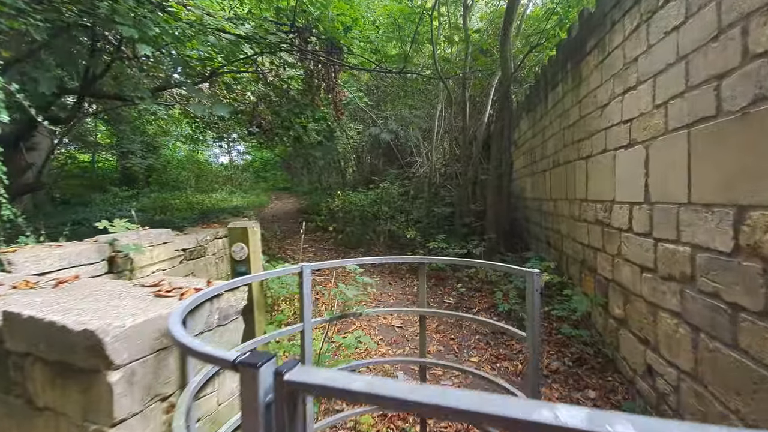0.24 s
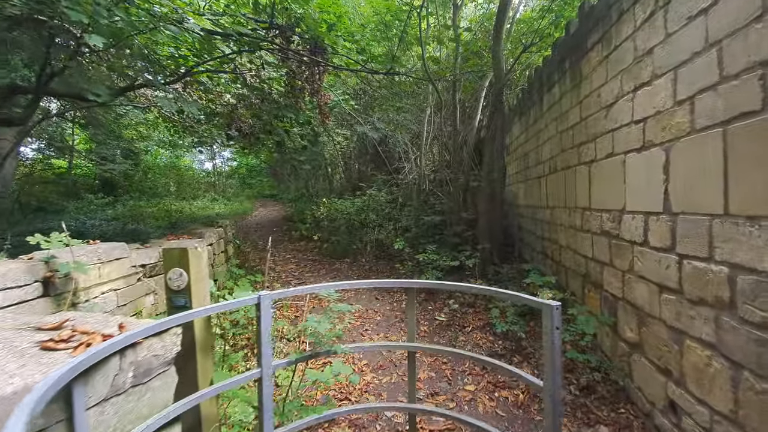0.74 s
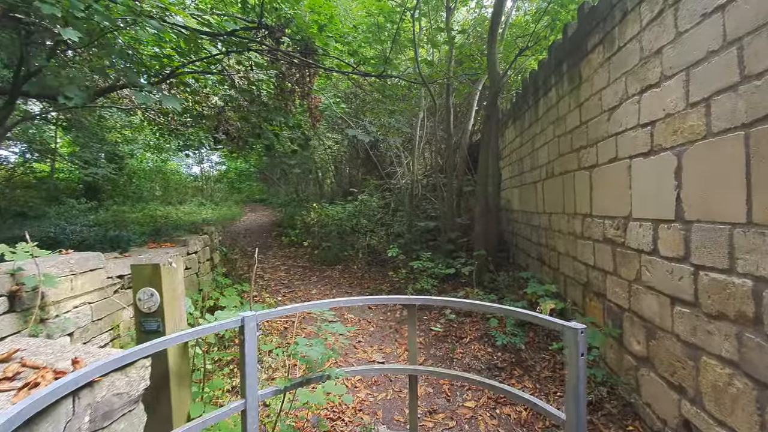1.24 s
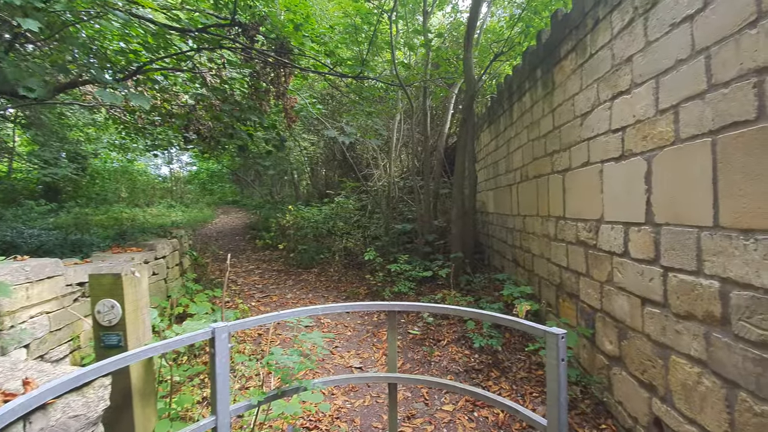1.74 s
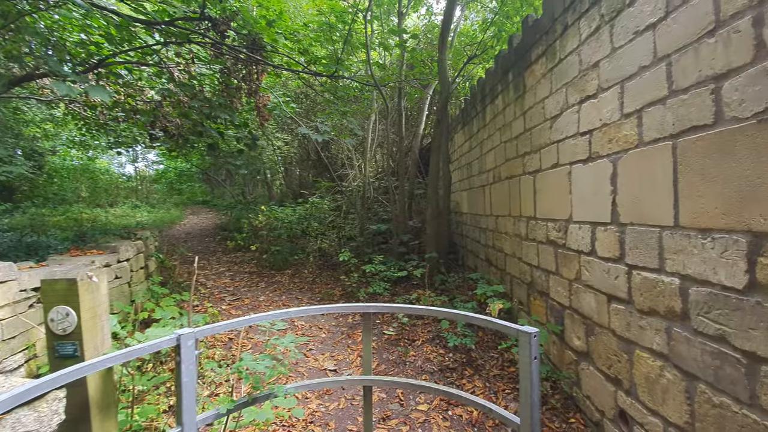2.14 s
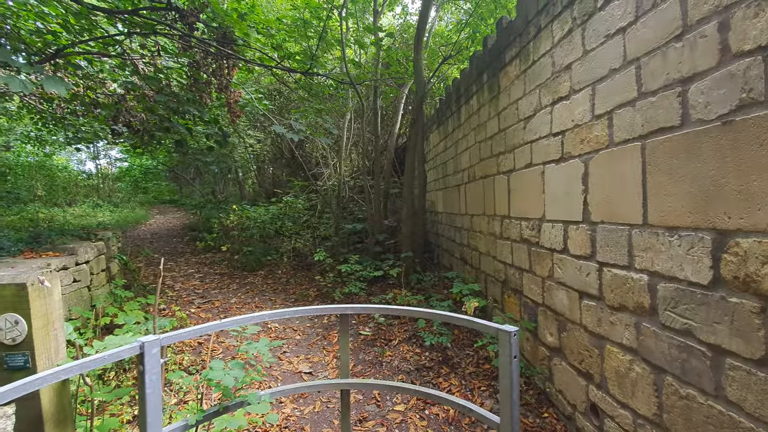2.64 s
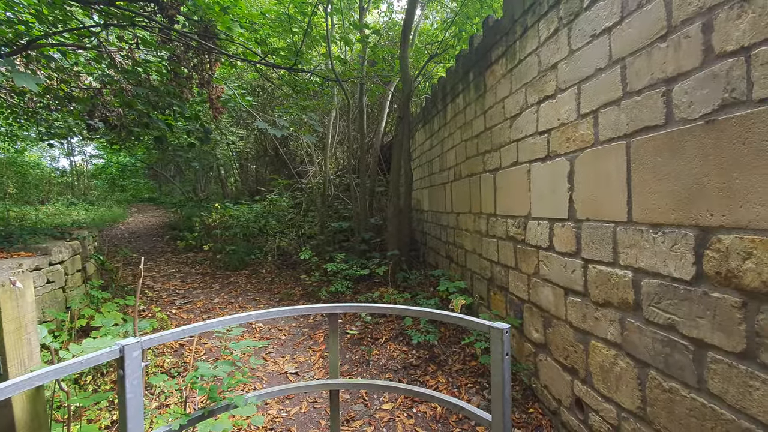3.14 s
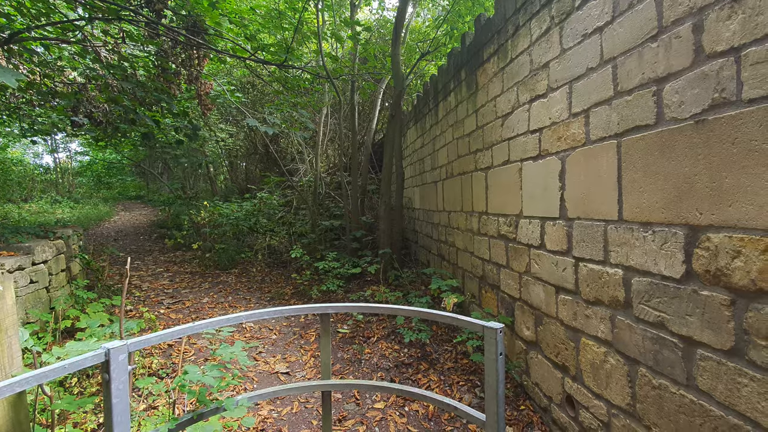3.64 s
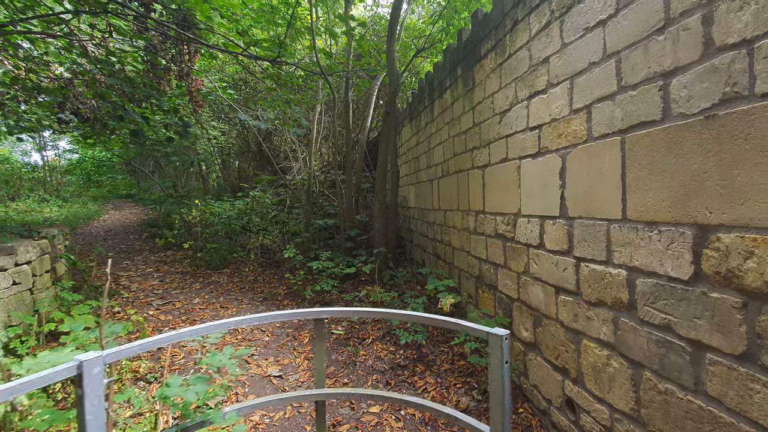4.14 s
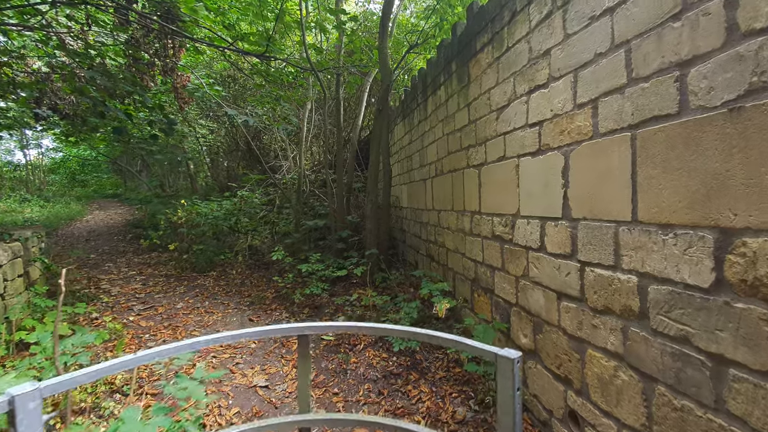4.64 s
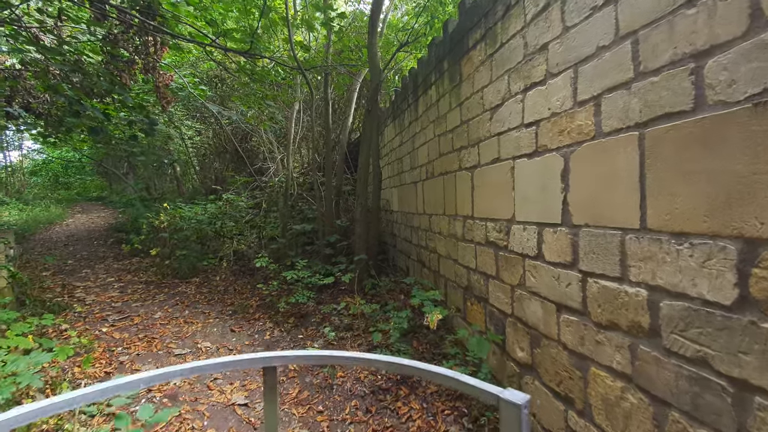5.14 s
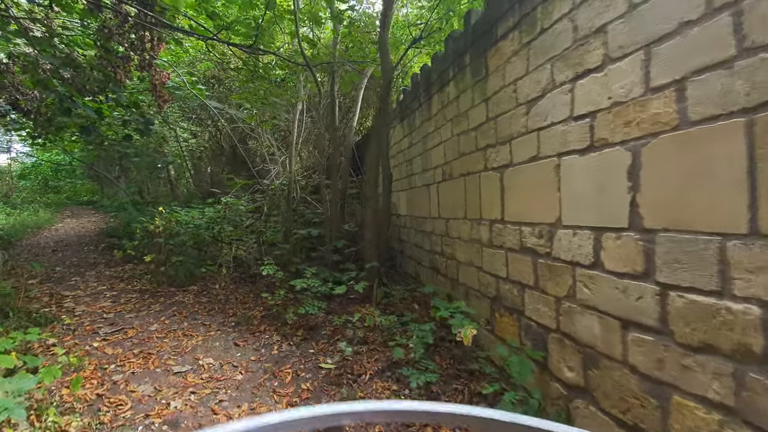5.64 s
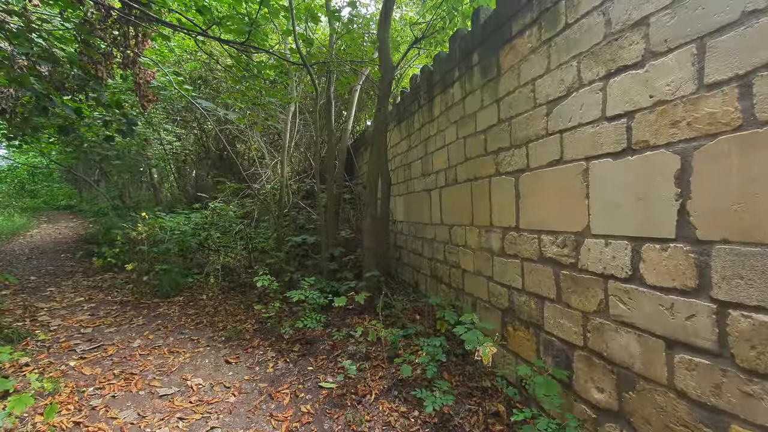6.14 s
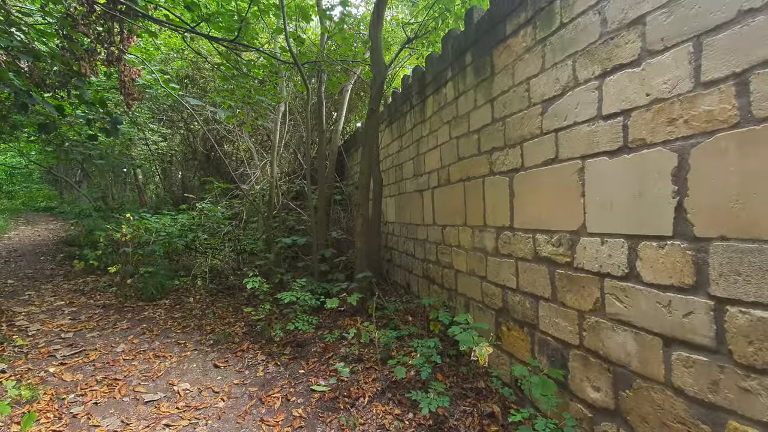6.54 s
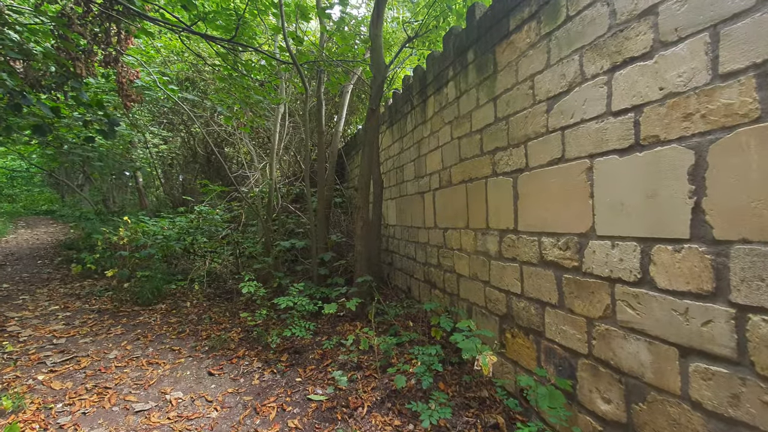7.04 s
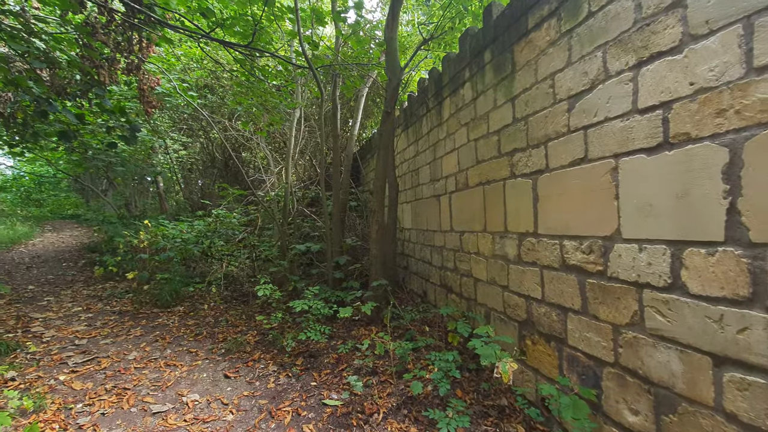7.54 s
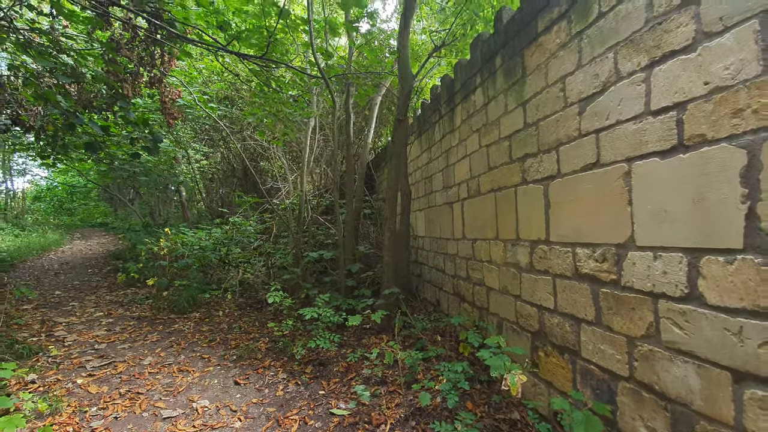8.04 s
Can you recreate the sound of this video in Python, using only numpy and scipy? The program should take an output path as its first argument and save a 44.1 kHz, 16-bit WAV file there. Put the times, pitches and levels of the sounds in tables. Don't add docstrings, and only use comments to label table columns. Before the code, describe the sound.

Outdoors under trees, faint leaf hiss and distant rumble throughout. Chirps and dry footsteps open, a hoarse bird caws twice far off, and thin steel bars are tapped gently. After a crisp latch knock and a few thuds on the microphone, the gate swings into its frame with a hard clang, rattles back a moment later, and its ring fades with a slight woodland echo.

```python
import sys
import numpy as np
from scipy import signal
from scipy.fft import rfft, irfft
from scipy.io import wavfile
from scipy.ndimage import uniform_filter1d, minimum_filter1d, map_coordinates

SR = 44100
rng = np.random.default_rng(int(sys.argv[2]) if len(sys.argv) > 2 else 0)


def nominal_scale(level):
    x = np.asarray(level, float) / 20
    return 10 ** x


def wav_out(sig):
    wavfile.write(sys.argv[1], SR, np.round(np.clip(np.atleast_2d(sig).T, -1, 1) * 32767).astype(np.int16))


N = 366471

# start_s, force_db, build_up_s, hardness_hz
LEAF_HITS = [
    (7.0215, -20.5, 0.0014, 12000),
    (7.0263, -28, .0005, 12000),
    (7.0322, -30.5, 0.00056, 12000),
    (7.0375, -32, .0005, 12000),
    (7.042, -32, 0.00035, 9000),
]
# start_s, force_db, build_up_s, hardness_hz
HOOP_HITS = [
    (7.203, -25, 0.006, 4300),
    (7.21, -30, 0.0015, 4300),
    (7.2255, -27, 0.0015, 15900),
    (7.231, -31, .001, 9000),
    (7.244, -27, 0.0015, 9000),
    (7.251, -30, .001, 9000),
    (7.36, -27, 0.026, 2440),
    (7.44, -42, 0.039, 3493),
]
# pitch_hz, level_db, t60_s
LEAF_MODES = [(961, -31, 0.7), (1390, -27, 0.58), (2224, -18, 0.04), (2595, -28, 0.7), (2611, -19, 0.18),
              (2763, -17, 0.09), (2966, -27, 0.39), (3044, -27, 0.33), (3114, -27, 0.48), (3136, -27, 0.27),
              (3222, -15, 0.09), (3253, -30, 0.7), (3278, -28, 0.48), (3377, -25, 0.22), (3417, -16, 0.1),
              (3462, -15, 0.22), (3474, -28, 0.27), (3591, -22, 0.22), (3713, -25, 0.22), (3736, -35, 0.5),
              (3799, -8, 0.09), (3835, -26, 0.48), (3848, -33, 0.7), (3949, -20, 0.15), (3994, -19, 0.22),
              (4025, -24, 0.27), (4125, -22, 0.18), (4162, -22, 0.18), (4187, -25, 0.27), (4223, -23, 0.18),
              (4368, -25, 0.22), (4450, -19, 0.18), (4511, -26, 0.22), (4561, -30, 0.39), (4590, -28, 0.22),
              (4660, -27, 0.22), (4875, -20, 0.15), (4957, -10, 0.04), (5028, -21, 0.18), (5229, -28, 0.39),
              (5276, -27, 0.18), (5341, -24, 0.22), (5403, -27, 0.27), (5507, -28, 0.18), (5575, -21, 0.22),
              (5638, -21, 0.07), (5812, -28, 0.15), (5986, -22, 0.09),
              (545, -38, .4), (639, -38, .4), (950, -39, .3), (1069, -28, .3), (1233, -31, .4),
               (1809, -35, .36), (1933, -35, .33), (2531, -29, .3), (6390, -30, .12), (6455, -36, .2),
               (7031, -32, .15), (7400, -36, .12), (9500, -36, .1)]
# pitch_hz, level_db (per Hz)
LEAF_CROWD = [(150, -69.5), (250, -31.5), (302, -25.5), (837, -24), (945, -11), (1140, -11), (1430, -14),
              (1510, -18), (3700, -0.5), (5600, -10.5), (15500, -35.5)]


def slam():
    swing_s = HOOP_HITS[1][0] - LEAF_HITS[1][0]
    return blow(LEAF_HITS, LEAF_MODES, LEAF_CROWD, early_db=10.5, damping=2.87, tilt=0.05,
                size=56000, main=1, free_s=swing_s)


# pitch_hz, level_db, t60_s
HOOP_MODES = [(787, -40, 0.7), (1327, -28, 0.07), (1390, -34, 0.7), (2078, -30, 0.18), (2410, -40, 0.48),
              (2531, -31, 0.7), (2587, -40, 0.58), (2600, -35, 0.7), (2623, -36, 0.39), (2680, -35, 0.7),
              (2692, -28, 0.7), (2723, -22, 0.27), (2735, -33, 0.48), (2761, -32, 0.48), (2837, -30, 0.58),
              (2851, -37, 0.39), (2882, -19, 0.27), (2954, -34, 0.13), (3039, -37, 0.33), (3248, -39, 0.48)]
# pitch_hz, level_db, t60_s
TUBES = [(543, -51, 1.7), (580, -50, 1.1), (640, -46, 1.8), (673, -48, 1.6), (774, -47, 1.3),
         (787, -48, 1.8), (951, -42, 1.0), (964, -43, 1.5), (1102, -53, 1.4), (1248, -52, 1.8),
         (1322, -54, 2.1), (2532, -41, 1.6), (2559, -43, .9), (2582, -42, .9), (2716, -42, .9),
         (2765, -44, 1), (2829, -48, 1.1), (2868, -42, 1), (2916, -50, 1.1), (2928, -46, 1.8),
         (3135, -42, .6), (3348, -38, .6), (3655, -40, .6), (4604, -47, .9), (5416, -46, .5)]
# pitch_hz, level_db (per Hz)
HOOP_CROWD = [(150, -69), (250, -54), (1360, -20.5), (1900, -20.5), (2330, -19.5), (2660, -4),
              (3060, -14.5), (4630, -5), (5800, -10.5), (8470, -23.5), (10400, -19.5), (13300, -34),
              (15500, -69)]
# pitch_hz, level_db, t60_s
CLAP_MODES = [(3493, -27, 0.12), (3892, -28, 0.17), (3920, -29, 0.24), (4130, -25, 0.1), (4178, -30, 0.29),
              (4292, -28, 0.2), (4364, -29, 0.12), (4516, -23, 0.29), (4582, -32, 0.29), (4658, -29, 0.29),
              (4686, -25, 0.29), (4698, -35, 0.42), (4738, -32, 0.24), (4863, -28, 0.17), (4899, -26, 0.24),
              (4982, -27, 0.1), (5131, -29, 0.2), (5366, -31, 0.17), (5521, -36, 0.5), (5577, -33, 0.24),
              (6037, -33, 0.29), (6149, -31, 0.14), (6244, -21, 0.04), (10104, -31, 0.08)]
# pitch_hz, level_db, t60_s
CLAP_FAINT = [(7200, -40, .15), (9500, -44, .25), (10400, -40, .1), (11200, -46, .12), (12100, -47, .15),
              (13300, -50, .1)]


def rebound():
    hoop = blow(HOOP_HITS, HOOP_MODES, HOOP_CROWD, early_db=6, damping=1.53, tilt=0.17,
                size=48000, main=1, free_s=0.25, lasting=TUBES)
    graze = struck(HOOP_HITS[1][0] - 0.003, CLAP_MODES[:-2], 9000, force_db=-8.4, free_s=0.017)
    clap = struck(HOOP_HITS[2][0], CLAP_MODES + CLAP_FAINT, 24000, force_db=-1.0)
    return hoop + graze + clap


# start_s, force_db, build_up_s, hardness_hz
LATCH_HITS = [
    (4.682, -49, 0.00039, 9100),
    (4.686, -38.5, 0.00091, 14000),
    (4.695, -31.5, 0.0012, 9100),
]
# pitch_hz, level_db, t60_s
LATCH_MODES = [(1445, -44, 0.2), (1490, -41, 0.2), (2139, -44, 0.39), (2720, -36, 0.07), (2783, -33, 0.26),
               (2842, -43, 0.26), (2894, -40, 0.21), (2949, -38, 0.26), (2996, -38, 0.11),
               (3892, -44, 0.32), (3949, -38, 0.14), (4388, -30, 0.04), (4766, -26, 0.05),
               (4813, -42, 0.16), (4932, -41, 0.14), (5000, -28, 0.04), (5092, -39, 0.17),
               (5298, -31, 0.07), (5332, -40, 0.17), (5349, -31, 0.13), (5372, -42, 0.18),
               (5917, -41, 0.17), (5973, -36, 0.08), (6103, -30, 0.06), (6632, -35, 0.11),
               (6902, -43, 0.32), (7962, -42, 0.09)]
# pitch_hz, level_db, t60_s
LATCH_FAINT = [(2815, -46.5, .75), (2757, -56, .9), (4670, -50, .4), (6331, -49, .16), (8150, -55, .2),
               (9400, -57, .12), (10750, -52, .13), (11900, -62, .12), (13100, -63, .12), (14500, -60, .09)]
# pitch_hz, level_db (per Hz)
LATCH_CROWD = [(290, -58), (500, -19.5), (1120, -16.5), (1470, -4.5), (1990, -11.5), (2840, -9),
               (4200, -10), (5200, -9.5), (10400, -17.5), (15500, -40)]


def latch_knock():
    return blow(LATCH_HITS, LATCH_MODES, LATCH_CROWD, early_db=-19, damping=0.96, tilt=0.38,
                size=24000, main=1, lasting=LATCH_FAINT)


# start_s, force_db, build_up_s, hardness_hz
RAIL_HITS = [
    (2.313, -50, 0.0008, 7000),
    (2.319, -44, 0.0014, 5970),
]
# pitch_hz, level_db, t60_s
RAIL_MODES = [(1512, -49, 0.24), (1839, -43, 0.1), (1930, -52, 0.24), (2161, -52, 0.2), (2539, -57, 0.5),
              (2644, -45, 0.08), (2785, -57, 0.5), (2809, -52, 0.42), (2850, -33, 0.06), (2917, -54, 0.29),
              (2943, -53, 0.29), (3637, -51, 0.2), (3941, -52, 0.35), (3963, -53, 0.35), (4195, -53, 0.2),
              (4225, -44, 0.12), (4280, -50, 0.1), (4739, -51, 0.17), (5406, -45, 0.08), (6190, -50, 0.2)]
# pitch_hz, level_db, t60_s
RAIL_FAINT = [(953, -54, .3), (840, -57, .2), (5443, -51, .2), (6050, -50, .08), (6907, -60, .14),
              (8037, -60, .16)]
# pitch_hz, level_db (per Hz)
RAIL_CROWD = [(290, -52), (500, -31), (709, -13), (1850, -8.5), (2290, -9), (2860, -8.5), (5580, -14),
              (12500, -24)]


def rail_knock():
    knock = blow(RAIL_HITS, RAIL_MODES, RAIL_CROWD, early_db=-11, damping=1.0, tilt=0.31,
                 size=18000, main=1, lasting=RAIL_FAINT)
    return knock + struck(RAIL_HITS[0][0], RAIL_MODES + RAIL_FAINT, 9000, force_db=-7, free_s=0.0052)


# start_s, force_db, build_up_s, hardness_hz
BAR_HITS = [
    (3.119, -44.5, 0.001, 8900),
    (3.13, -39.5, 0.0022, 6070),
]
# pitch_hz, level_db, t60_s
BAR_MODES = [(1260, -46, 0.22), (1309, -46, 0.15), (1407, -47, 0.27), (1812, -46, 0.13), (1924, -49, 0.48),
             (1993, -43, 0.18), (2037, -48, 0.15), (2275, -49, 0.27), (2341, -47, 0.15), (2447, -46, 0.18),
             (2522, -51, 0.33), (2603, -48, 0.18), (2721, -43, 0.06), (3202, -49, 0.18), (3831, -49, 0.22),
             (3883, -43, 0.22), (3934, -50, 0.39), (3958, -49, 0.33), (4045, -43, 0.1), (4169, -43, 0.1),
             (4603, -40, 0.05), (4946, -42, 0.09), (5029, -49, 0.13), (5428, -36, 0.08)]
# pitch_hz, level_db, t60_s
BAR_FAINT = [(953, -53, .4), (1394, -53, .75), (5060, -49, .25), (5491, -49, .26), (6500, -56, .12),
             (6988, -57, .16), (7940, -60, .12)]
# pitch_hz, level_db (per Hz)
BAR_CROWD = [(290, -29), (500, -8), (625, -24), (923, -17), (1380, -6), (3020, -10.5), (3990, -6),
             (8500, -19), (11000, -73)]


def bar_knock():
    return blow(BAR_HITS, BAR_MODES, BAR_CROWD, early_db=-15.0, damping=0.94, tilt=0.24,
                size=18000, lasting=BAR_FAINT)


# start_s, force_db, build_up_s, hardness_hz
STAY_HITS = [
    (3.417, -48, 0.0011, 8900),
    (3.427, -49.5, 0.0009, 5130),
]
# pitch_hz, level_db, t60_s
STAY_MODES = [(1927, -52, 0.25), (1983, -54, 0.22), (2016, -46, 0.18), (2125, -55, 0.18), (2274, -54, 0.25),
              (2491, -52, 0.22), (2524, -47, 0.22), (2564, -54, 0.15), (2884, -49, 0.15), (2924, -55, 0.18),
              (2958, -40, 0.09), (3021, -53, 0.15), (3207, -47, 0.11), (4041, -50, 0.09), (6150, -53, 0.15),
              (5004, -54, 0.11)]
# pitch_hz, level_db (per Hz)
STAY_CROWD = [(410, -52), (700, -18), (1220, -7.5), (1620, -14), (1960, -3), (2140, -8), (2960, -4),
              (8500, -15), (11000, -66)]


def stay_knock():
    return blow(STAY_HITS, STAY_MODES, STAY_CROWD, early_db=-14, damping=1.0, tilt=0.074, size=18000, main=1)


def gate_blows():
    knocks = rail_knock() + bar_knock() + stay_knock() + latch_knock()
    bass_cut = signal.butter(2, 400, "high", fs=SR, output="sos")
    return signal.sosfilt(bass_cut, knocks + slam() + rebound())


def blow(hits, modes, crowd, early_db, damping, tilt, size, main=0, free_s=0.08, lasting=()):
    out = np.zeros(N + size)
    fade = np.clip((size - np.arange(size)) / (0.05 * SR), 0, 1)
    out[round(hits[0][0] * SR):][:size] = fade * crowd_ring(hits, crowd, damping, tilt, early_db, size)
    main_s = hits[main][0]
    return out[:N] + struck(main_s, modes, size, free_s=free_s) + struck(main_s, lasting, size)


def struck(s, modes, size, force_db=0, free_s=9):
    out, t = np.zeros(N + size), np.arange(size) / SR
    caught_t60_s = 0.15
    caught_db = force_db - 60 * np.maximum(t - free_s, 0) / caught_t60_s
    for (hz, level_db, t60), (turn, beat, lag) in zip(modes, rng.random((70, 3))):
        bloom = 1 - np.exp(-t * hz / 3)
        waver_db = 3.5 * np.clip((hz / 5000) ** 2, 0.5, 1)
        waver_db = waver_db * np.sin(2 * np.pi * (45 * (0.3 + beat) * t + lag))
        height = nominal_scale(level_db + caught_db + waver_db - 60 * t / t60) * bloom
        out[round(s * SR):][:size] += height * np.sin(2 * np.pi * (hz * t + turn))
    return out[:N]


# pitch_hz, t60_s
CROWD_DECAY = [(300, 0.83), (1000, 0.43), (3000, 0.27), (6000, 0.14), (10000, 0.088), (15000, 0.09)]


def crowd_ring(hits, crowd, damping, tilt, early_db, size):
    hz = np.maximum(np.fft.rfftfreq(size, 1 / SR), 1)
    noise = rfft(rng.standard_normal(size)) * nominal_scale(at_hz(crowd, hz))
    streaks_db = 4.5 * map_coordinates(rng.standard_normal(800), [hz / 20], order=1)
    noise = noise * nominal_scale(streaks_db)
    noise = noise / np.sqrt(np.mean(np.abs(noise) ** 2) / size)
    octaves = np.arange(np.log2(200), np.log2(18000), 1 / 3)[:, None]
    shares = np.sqrt(np.clip(1 - 3 * np.abs(np.log2(hz) - octaves), 0, 1))
    centre_hz = 2 ** octaves
    t60 = damping * at_hz(CROWD_DECAY, centre_hz) * (centre_hz / 3000) ** tilt
    energy = 0
    for s, force_db, build_s, hard_hz in hits:
        t = np.maximum(np.arange(0, size, 4) / SR - (s - hits[0][0]), 0)
        early = 1 + nominal_scale(early_db - 60 * t / 0.05)
        height = nominal_scale(force_db - 60 * t / t60) * early * (1 - np.exp(-t / build_s))
        energy = energy + height ** 2 / (1 + (centre_hz / hard_hz) ** 6)
    heights = uniform_filter1d(np.repeat(np.sqrt(energy), 4, axis=1), size=4, axis=1)
    return np.sum(irfft(noise * shares, size) * heights, axis=0)


# peak_s, level_db, rise_s, fall_s, pitch_hz
HINGE = [
    (6.94, -49, .085, .3, 461),
    (5.48, -66, .7, .12, 776),
    (3.56, -56, .08, .13, 311),
    (5.215, -59, .03, .07, 312),
]


def hinge(wobble, wobble_per_s, flutter_db):
    out = np.zeros(N)
    for *shape, hz in HINGE:
        where, t, gain = swell(*shape)
        pitch = hz * (1 + wobble * drift(wobble_per_s, size=len(t)))
        flutter = nominal_scale(flutter_db * drift(70, size=len(t)))
        out[where] += np.sqrt(2) * gain * flutter * np.sin(2 * np.pi * np.cumsum(pitch) / SR)
    return out


# peak_s, level_db, rise_s, fall_s
SHUDDER = [
    (7.18, -51, 0.05, 0.09),
    (7.25, -51.5, .1, .6),
]
# pitch_hz, level_db (per Hz)
SHUDDER_COLOUR = [(110, -17.5), (190, -10), (300, -1), (450, -8.5), (900, -12), (1500, -48.5)]


def shudder():
    return lumpy_noise(SHUDDER, SHUDDER_COLOUR, lumpy_db=1.0)


# peak_s, level_db, length_s
CRUNCH = [(0.405, -57.5, 0.15), (.566, -58, 0.24), (0.67, -61, 0.042), (0.808, -59.5, 0.13),
          (0.89, -59.5, 0.83), (4.1, -63, 0.46), (5.22, -62, 0.33), (5.453, -60, 0.3),
          (5.971, -46.5, 0.0066), (6.178, -59, 0.052), (6.62, -62, 0.13), (6.664, -64, 0.12)]
# pitch_hz, level_db (per Hz)
CRUNCH_COLOUR = [(1500, -5), (2500, -3.5), (4500, 5), (8000, -10.5), (12000, -23), (15000, -33)]


def crunch(per_s, spread_db):
    sizes = nominal_scale(spread_db * np.minimum(rng.exponential(1, N), 5)) * rng.choice([-1, 1], N)
    snaps = coloured(sizes * (rng.random(N) < per_s / SR), CRUNCH_COLOUR)
    rise = 0.48
    return snaps * swells([(s, level_db, rise * length_s, (1 - rise) * length_s)
                           for s, level_db, length_s in CRUNCH])


# start_s, peak_db, pitch_hz
TICKS = [(0.305, -48, 1100), (0.3046, -52, 1780), (0.398, -55, 5200), (4.682, -32, 5000),
         (6.3255, -49, 4500), (0.51, -47, 4200), (0.5598, -39, 4230), (0.6674, -51, 4790),
         (1.681, -49, 4430), (5.2156, -47, 5300), (5.222, -48, 4700), (5.228, -47, 5350),
         (5.9707, -59, 1050), (6.173, -59, 4200), (6.325, -41.5, 930), (6.333, -43.5, 2520)]


def ticks(cycles):
    out = np.zeros(N + 2000)
    dull = signal.butter(2, [700, 9000], "band", fs=SR, output="sos")
    for s, peak_db, hz in TICKS:
        force = rng.standard_normal(2000) * np.exp(-np.arange(2000) / (0.0012 * SR))
        tick = signal.sosfilt(dull, ring(force, hz, cycles / hz) + 0.34 * force)
        out[round(s * SR):][:2000] += nominal_scale(peak_db) * tick / np.abs(tick).max()
    return out[:N]


# start_s, peak_db, pitch_hz, rise_s, t60_s
JOLTS = [(3.455, -44, 31.5, .02, 0.15), (3.51, -42, 32, 0.015, 0.17), (3.6, -68, 125, 0.033, 0.54),
         (4.363, -49.5, 86.5, .03, 0.097), (5.84, -56, 45, .01, 0.046), (5.879, -26.5, 47.4, 0.0064, 0.094),
         (5.948, -32.5, 166, 0.0047, 0.019), (6.0, -45, 49.6, .01, 0.04), (6.109, -51.5, 171, .01, 0.067),
         (6.306, -40, 90, .008, 0.041), (6.33, -33.5, 175, 0.0029, 0.094), (6.36, -42, 45, 0.0092, 0.058),
         (6.387, -44.5, 146, 0.0076, 0.049), (6.41, -43, 39.6, .012, 0.077)]


def jolts():
    out, t = np.zeros(N + SR), np.arange(SR // 2) / SR
    for s, peak_db, hz, rise_s, t60 in JOLTS:
        shape = (1 - np.exp(-t / rise_s)) ** 2 * nominal_scale(-60 * t / t60)
        swing = np.sin(2 * np.pi * hz * t * (1 - 1.13 * np.minimum(t, 0.15)))
        out[round(s * SR):][:len(t)] += nominal_scale(peak_db) * shape / shape.max() * swing
    return out[:N]


# peak_s, level_db, rise_s, fall_s
RUBS = [
    (3.512, -57, 0.13, 0.35),
    (5.955, -42, 0.12, 0.037),
    (6.334, -48, 0.087, 0.135),
]
# pitch_hz, level_db (per Hz)
RUB_COLOUR = [(40, -16), (120, -7), (300, -17), (650, -21), (1000, -30.5), (2500, -44), (5000, -72)]


def hand_rubs():
    return lumpy_noise(RUBS, RUB_COLOUR, lumpy_db=2.0)


# start_s, level_db, length_s, pitch_hz
RISING = [(0, -54, 0.032, 6070), (.03, -66, 0.099, 6850), (.13, -50.5, 0.068, 4330),
          (.175, -54, 0.057, 4890), (.33, -58.5, 0.065, 4420), (.805, -64, 0.03, 4320),
          (.865, -50, 0.063, 3720), (.885, -51, 0.029, 4190), (.972, -59, 0.092, 4380),
          (1.045, -61, 0.032, 3900), (1.08, -50.5, 0.045, 4260), (1.122, -56, 0.03, 4000),
          (1.143, -59, 0.04, 4250), (1.215, -59, 0.034, 4260), (1.29, -64, 0.054, 4500)]
# start_s, level_db, length_s, pitch_hz
FALLING = [
    (.198, -50.5, 0.067, 4950),
    (.232, -60, 0.086, 4900),
    (.285, -60, 0.031, 4900),
]


def songbirds():
    tremble, broken_db = 0.014, 5
    rising = whistles(RISING, 1500, tremble, broken_db)
    return rising + whistles(FALLING, -14000, tremble, broken_db)


def whistles(rows, slide_hz_per_s, wobble, flutter_db):
    out, attack = np.zeros(N), 0.25
    for s, level_db, length_s, hz in rows:
        t = np.arange(round(length_s * SR)) / SR
        ramp = np.minimum(t / attack, (length_s - t) / (1 - attack)) / length_s
        shape = np.sin(np.pi / 2 * ramp)
        pitch = (hz + slide_hz_per_s * t) * (1 + wobble * drift(132, size=len(t)))
        level = nominal_scale(level_db + flutter_db * drift(270, size=len(t)))
        out[round(s * SR):][:len(t)] += np.sqrt(2) * shape * level * np.sin(2 * np.pi * np.cumsum(pitch) / SR)
    return out


# start_s, level_db, pitch_hz
CAWS = [
    (1.0, -58, 2176),
    (2.47, -56.5, 2190),
]


def caws(pulse_hz, width_hz):
    out = np.zeros(N)
    rise_s, fall_s, sag_hz_per_s = 0.07, 0.27, -500
    for s, level_db, hz in CAWS:
        where, t, gain = swell(s + rise_s, level_db, rise_s, fall_s)
        rough = signal.lfilter(*signal.butter(1, width_hz, fs=SR), rng.standard_normal(SR)[:len(t)])
        beats = 0.5 + 0.5 * np.cos(2 * np.pi * pulse_hz * t)
        carrier = np.sin(2 * np.pi * (hz + sag_hz_per_s * t / 2) * t)
        out[where] += gain * rms_one(carrier * beats * (0.8 + rms_one(rough)))
    return out


def wood(x, t60):
    t = np.arange(SR) / SR
    tail = rng.standard_normal(SR) * nominal_scale(-60 * t / t60) * np.clip(t / 0.022, 0, 1)
    tail = signal.lfilter(*signal.butter(1, 6000, fs=SR), tail)
    return signal.fftconvolve(x, tail / np.sqrt(np.sum(tail ** 2)))[:N]


# time_s, level_db
AIR_LEVEL = [(0.0, 0.5), (.9, 1), (1.7, 0), (3.1, -1), (3.7, 0.5), (4.9, 3), (6.3, 2), (6.901, 1.5),
             (7.9, -0.5), (8.31, -1)]
# pitch_hz, level_db (per Hz)
RUMBLE = [(12, -30.5), (20, -3), (81, 0.5), (145, -5.5), (271, -6.5), (306, -5), (332, -5.5), (775, -10),
          (1340, -11), (2500, -27), (3250, -55.5)]
# pitch_hz, level_db (per Hz)
HISS = [(710, -34), (1200, -17), (1380, -1), (1490, -4.5), (1940, -4), (3820, -2.5), (4490, -0.5),
        (5560, -6), (5990, -10.5), (15600, -29)]


def air(gust_db):
    air_db = np.interp(np.arange(N) / SR, *np.transpose(AIR_LEVEL))
    rumble_gain = nominal_scale(-61.5 + 0.92 * air_db + gust_db * drift(2.8))
    rumble = rumble_gain * coloured(rng.standard_normal(N), RUMBLE)
    hiss_gain = nominal_scale(-66.5 + air_db + gust_db * drift(20))
    hiss = hiss_gain * coloured(rng.standard_normal(N), [(600, -46.0)] + HISS)
    return rumble + hiss


def lumpy_noise(rows, colour, lumpy_db):
    return swells(rows) * nominal_scale(lumpy_db * drift(60)) * coloured(rng.standard_normal(N), colour)


def swell(peak_s, level_db, rise_s, fall_s):
    start = max(round((peak_s - rise_s) * SR), 0)
    stop = min(round((peak_s + fall_s) * SR), N)
    t = np.arange(start, stop) / SR - peak_s
    away = np.maximum(-t / rise_s, t / fall_s)
    return slice(start, stop), t - t[0], nominal_scale(level_db - 20 * away) * np.clip(10 * (1 - away), 0, 1)


def swells(rows):
    level = np.zeros(N)
    for row in rows:
        where, _, gain = swell(*row)
        level[where] += gain
    return level


def ring(force, hz, t60):
    r, w = nominal_scale(-60 / (t60 * SR)), 2 * np.pi * hz / SR
    return signal.lfilter([0, np.sin(w)], [1, -2 * r * np.cos(w), r * r], force + 1e-18)


def drift(rate, size=N):
    points = rng.standard_normal(N // 200)
    return map_coordinates(points, [np.arange(size) * rate / SR], order=3)


def coloured(x, spectrum):
    hz = np.maximum(np.fft.rfftfreq(len(x), 1 / SR), 1)
    return rms_one(irfft(rfft(x) * nominal_scale(at_hz(spectrum, hz)), len(x)))


def rms_one(x):
    return x / np.sqrt(np.mean(x ** 2) + 1e-20)


def at_hz(points, hz):
    table_hz, values = np.transpose(points)
    return np.interp(np.log(hz), np.log(table_hz), values)


def scene():
    gate = hinge(wobble=0.0017, wobble_per_s=15, flutter_db=0.0) + gate_blows() + shudder()
    birds = songbirds() + caws(pulse_hz=45, width_hz=70)
    feet = crunch(per_s=8000, spread_db=3.0) + ticks(cycles=17)
    echo = wood(nominal_scale(-20.5) * gate, t60=0.49) + wood(nominal_scale(-10) * birds, t60=0.3)
    hand = jolts() + hand_rubs()
    return (gate + nominal_scale(-6.0) * birds + echo + feet + hand + air(gust_db=0.4))[None]


def low_pass(x):
    return signal.sosfilt(signal.butter(12, 15710, fs=SR, output="sos"), x)


def record(dry):
    rolled = signal.sosfilt(signal.butter(4, 14500, fs=SR, output="sos"), dry)
    room = np.minimum(1, 0.99 / (np.abs(rolled) + 1e-9))
    gain = uniform_filter1d(minimum_filter1d(room, size=129), size=129)
    return low_pass(rolled * gain)


dry = scene()
out = record(dry)
wav_out(out)
```